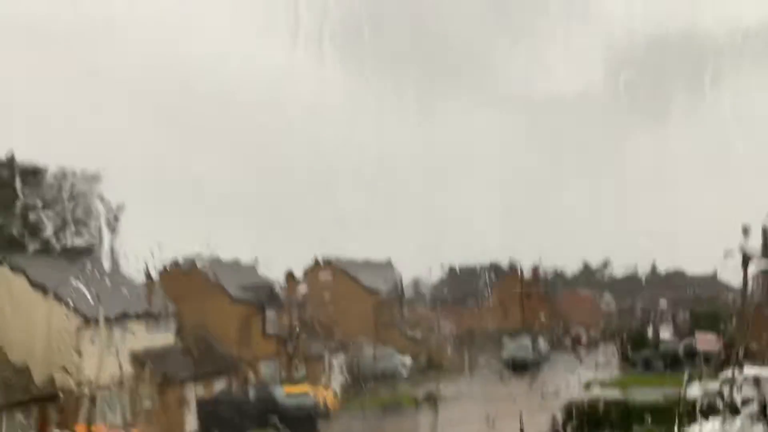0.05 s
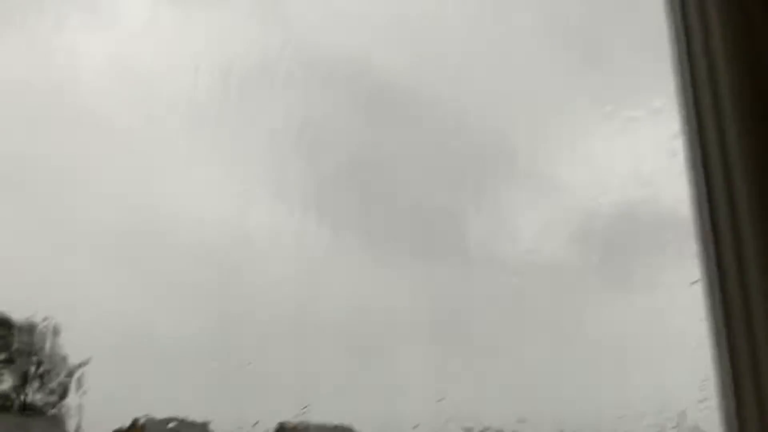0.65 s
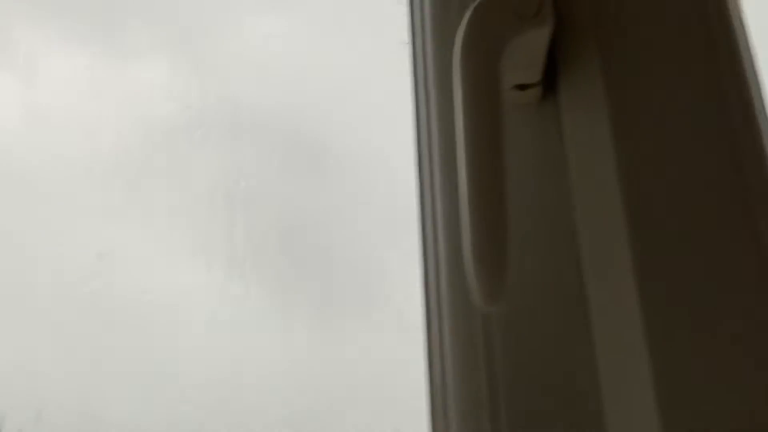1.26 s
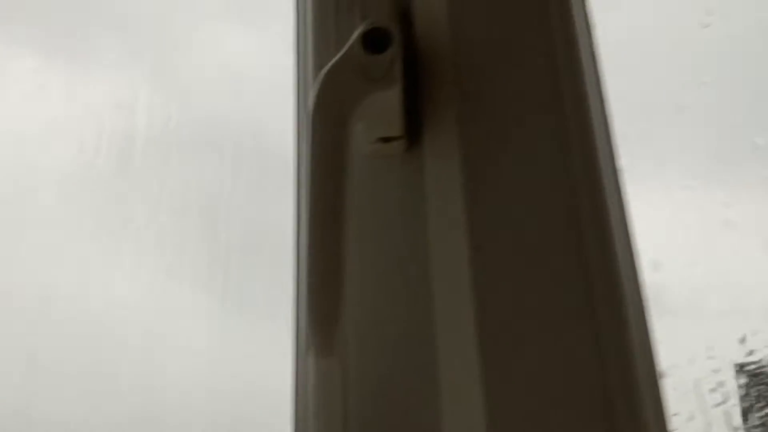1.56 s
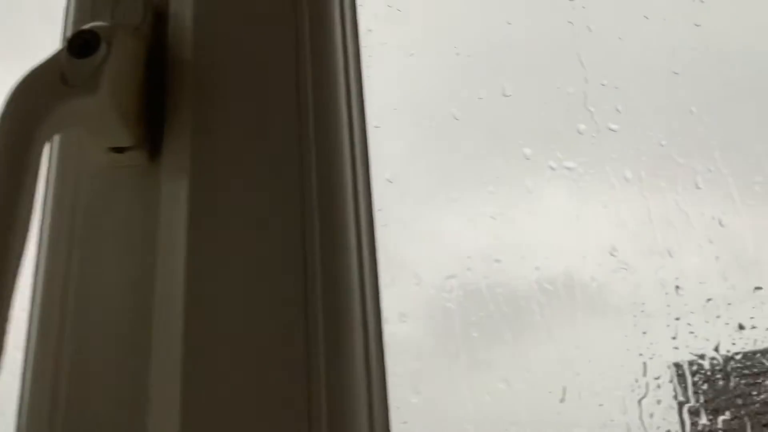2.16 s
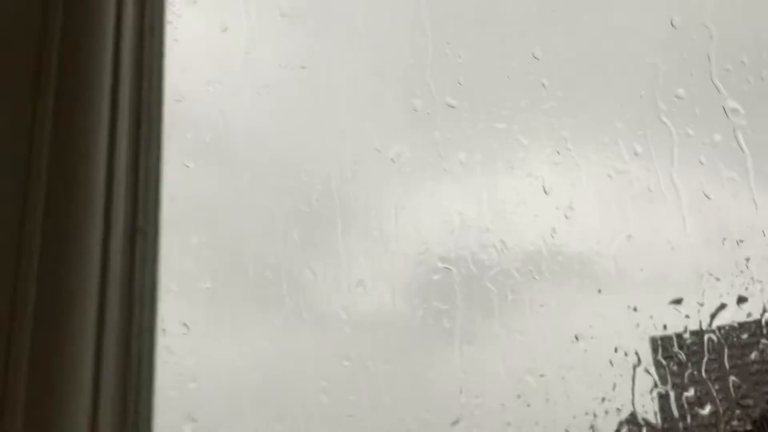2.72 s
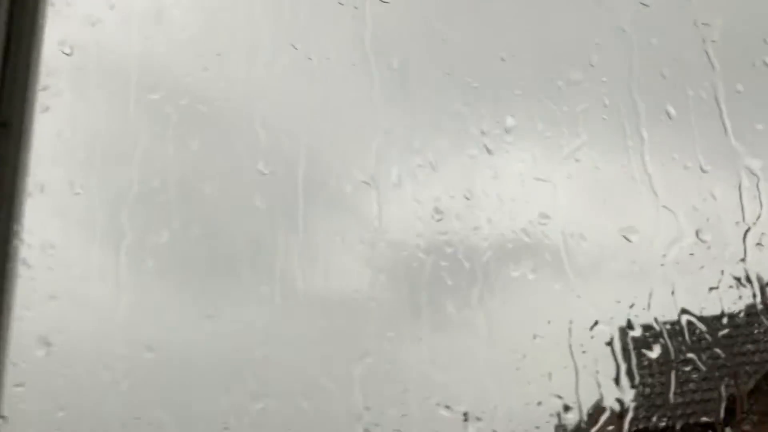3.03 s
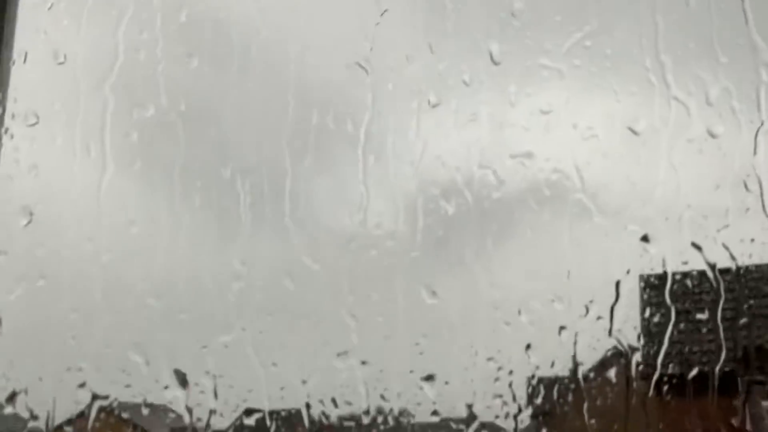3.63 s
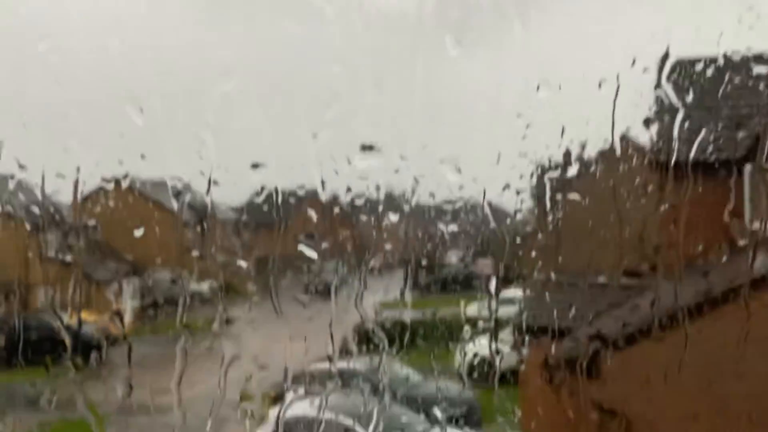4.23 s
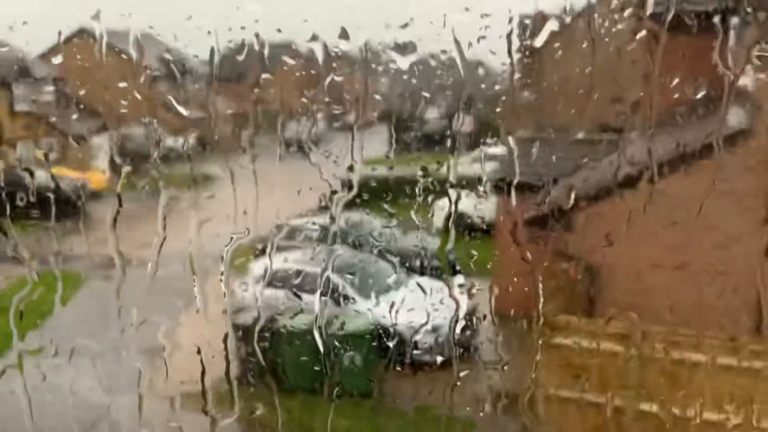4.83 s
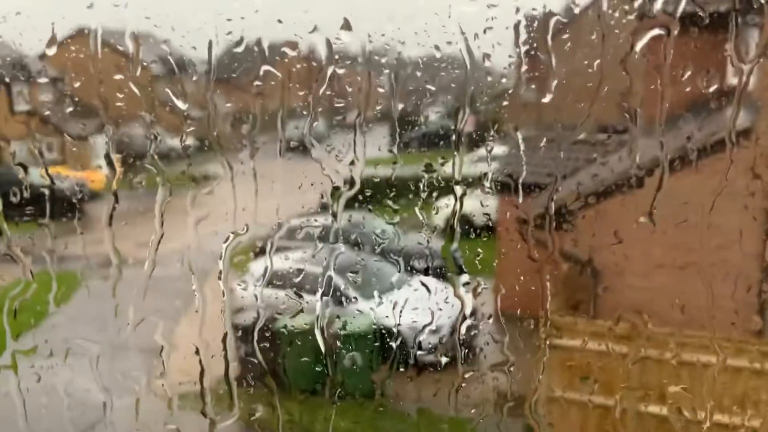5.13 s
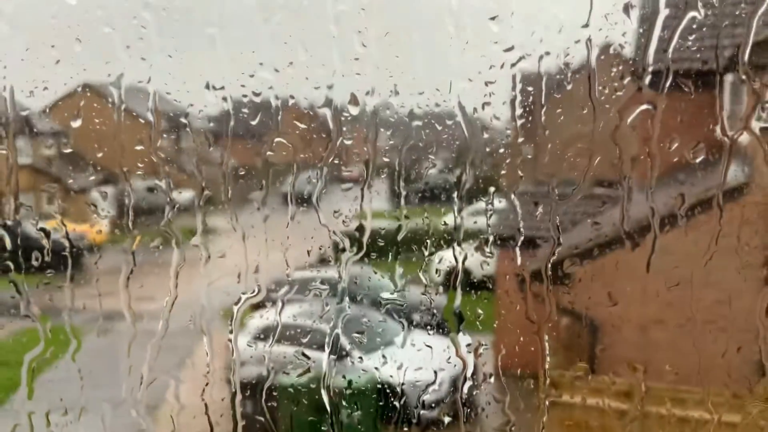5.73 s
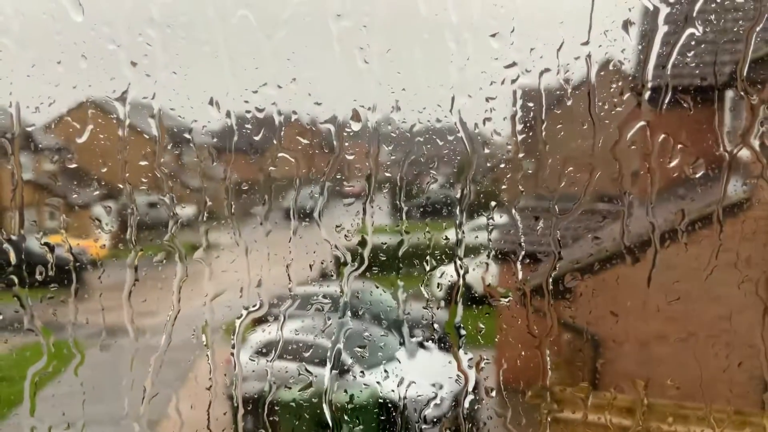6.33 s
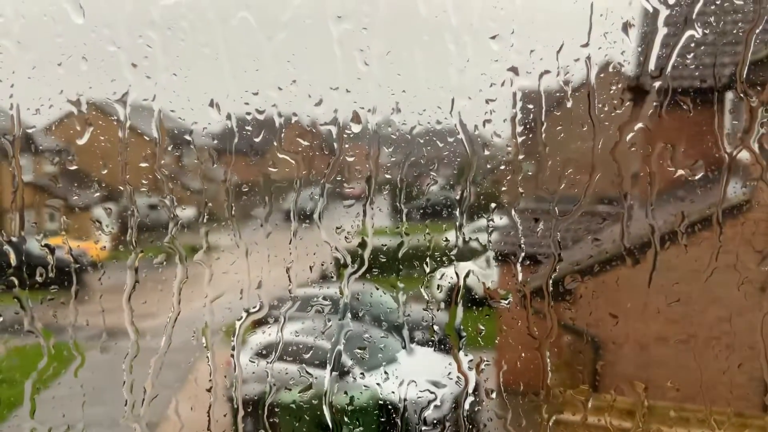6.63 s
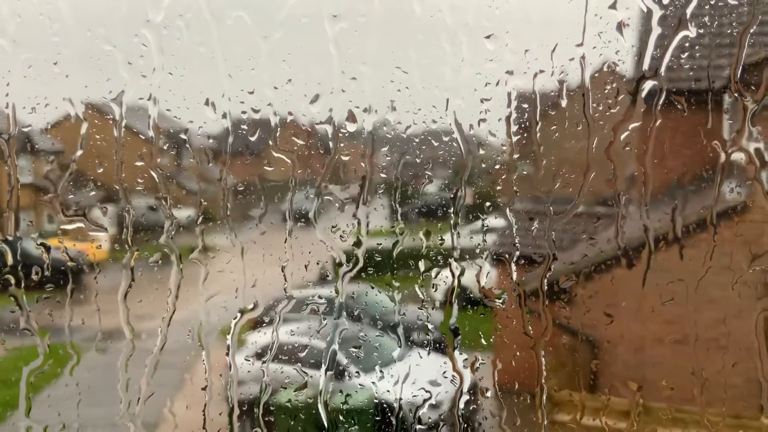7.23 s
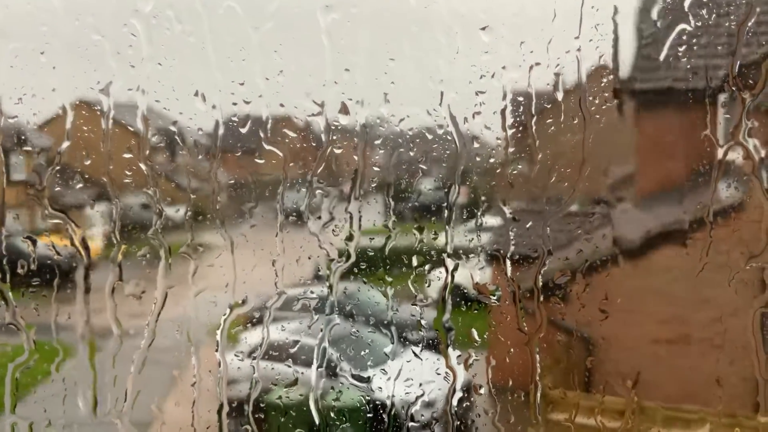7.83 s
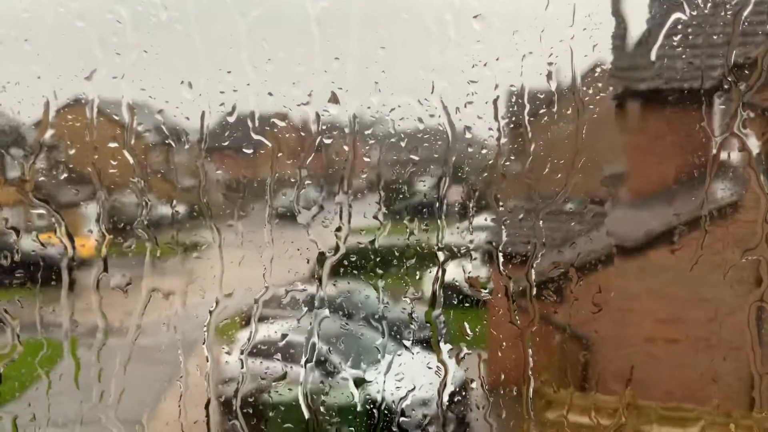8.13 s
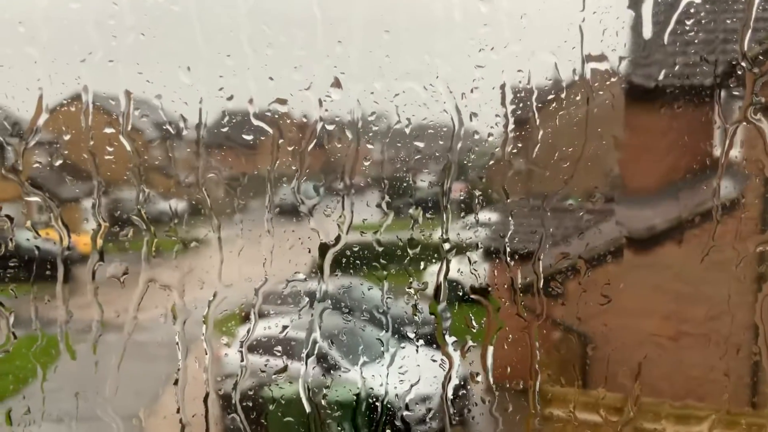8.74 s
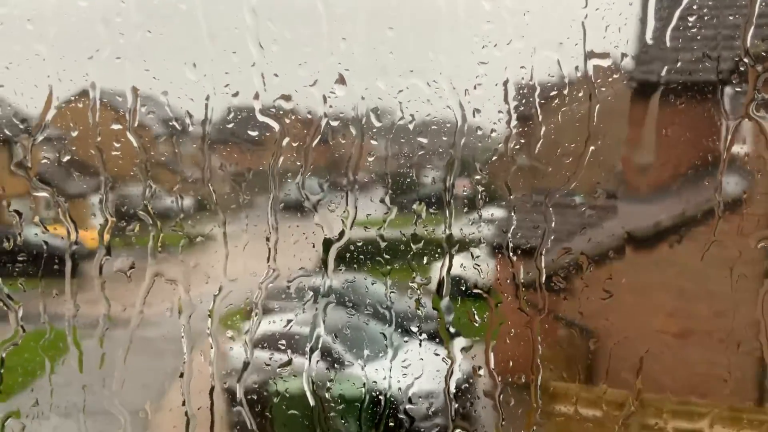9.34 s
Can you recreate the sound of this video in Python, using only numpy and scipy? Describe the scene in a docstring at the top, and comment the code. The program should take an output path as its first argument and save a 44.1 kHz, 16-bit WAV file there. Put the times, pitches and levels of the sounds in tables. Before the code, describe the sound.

Rain taps against window glass from outside while wind rumbles; early on, cloth hisses and fingers rub and bump the microphone.

```python
"""Wind-driven rain on a double-glazed window, heard from the room behind it.
Each drop is an impact that excites the modes of the pane; the patter swells in squalls, over the wash
of rain in the street and a low rumble of wind. A hand-held microphone is swung past the frame: a sleeve
hisses by friction, comb-filtered by its own echoes, and fingers rub and knock on the case, which
carries their vibration to the microphone's two ports."""
import sys
import numpy as np
from scipy import signal
from scipy.fft import rfft, irfft, next_fast_len
from scipy.io import wavfile
from scipy.ndimage import map_coordinates

SR = 44100
rng = np.random.default_rng(int(sys.argv[2]) if len(sys.argv) > 2 else 0)


def log_audio(samples):
    """Write samples as a 16-bit WAV file to the path given in sys.argv[1]."""
    # one column per channel
    frames = np.atleast_2d(samples).T
    # limit to full scale, then quantise
    limited = np.clip(frames, -1, 1)
    pcm = np.round(limited * 32767).astype(np.int16)
    wavfile.write(sys.argv[1], SR, pcm)


N = 413216
TIME = np.arange(N) / SR
FFT_SIZE = next_fast_len(N + SR // 2, real=True)
BIN_HZ = np.maximum(np.arange(FFT_SIZE // 2 + 1) * SR / FFT_SIZE, 1)
BODY_FOLLOWS = 0.58   # dB of change in the rain's dull body per dB of drive

# How hard the rain drives at the pane. Each row: time in seconds, drive in dB.
RAIN_COURSE = [(0, -65), (1.25, -64.5), (1.48, -72.5), (1.75, -60), (2.8, -61.5), (3.0, -64.5), (3.5, -62),
               (3.63, -69.5), (3.8, -62), (4.95, -60.5), (5.5, -69), (7.3, -72.5), (7.8, -74.5),
               (9.37, -73)]
# Squalls throw extra water at the glass. Each row: time of the peak in seconds, added drive in dB.
SQUALL_PEAKS = [(.3, 2), (.66, 4.5), (6.08, 4), (6.31, 9), (6.7, 2.5), (7.12, 4), (7.51, 9.5), (8.06, 3.5),
                (8.48, 4.5), (9.32, 6.5)]
# Spectrum of the rain. Each row: frequency in Hz, gain in dB.
RAIN_SPECTRUM = [(280, 0), (520, 1.5), (690, -2), (790, 0), (900, -1), (1100, 0), (1330, -5), (1600, -4),
                 (2150, -9.5), (2400, -17.5), (2680, -21), (3100, -19), (4400, -23.5), (6200, -27),
                 (7300, -33.5), (9300, -34.5), (15000, -56.5)]
# Modes of the pane. Each row: frequency in Hz, relative level in dB, time to fall 60 dB in seconds.
PANE_MODES = [(770, 5, 0.036), (1586, 6, 0.036), (1790, 1.5, 0.059), (2072, 2, 0.045), (3445, -10, 0.07),
              (4030, -10.5, .06), (4850, -11, 0.044), (6340, -10, 0.053), (8300, -23, 0.05)]
# Sharp impacts: two bright clicks of the sleeve's cloth, then heavy drops on the pane. Each row: start
# in seconds, tap peak in dB, tap pitch in Hz, bright peak in dB, ping pitch in Hz, decay time in ms.
SHARP_IMPACTS = [(4.507, -58, 1600, -41, 7000, 3), (4.556, -60, 1600, -45, 6500, 3),
                 (5.0509, -40.5, 1500, -46, 3680, 5), (5.07, -55, 1600, -46, 6940, 2.8),
                 (5.281, -60, 1610, -49, 5030, 5.4), (5.3445, -53, 1600, -59, 3850, 5),
                 (5.3646, -53, 1600, -53, 6400, 3.7), (6.234, -51, 2100, -62, 4850, 6),
                 (6.628, -49, 1590, -65, 5050, 7.7), (7.0135, -53, 1440, -58, 4400, 4),
                 (7.487, -52, 1600, -57, 5900, 10), (7.5844, -54, 1630, -61, 3600, 6.7),
                 (8.043, -51, 1750, -67, 5250, 5), (8.167, -50, 1400, -56, 3120, 5.5),
                 (8.212, -52, 2170, -59, 3900, 5), (8.435, -58, 2200, -67, 4450, 7),
                 (8.623, -58, 1600, -61, 3050, 6), (8.7155, -47, 1650, -59.5, 4520, 11),
                 (8.6475, -51, 800, -61, 4950, 5), (8.886, -51.5, 1600, -55, 4800, 10),
                 (9.0516, -48, 1500, -51.5, 4600, 4.5), (9.208, -50, 1600, -53.5, 4440, 5),
                 (9.318, -50, 1370, -54, 5200, 7), (9.326, -47.5, 1360, -56, 6360, 9.8)]
# Drips on the sill. Each row: start in seconds, peak in dB, resonance in Hz.
SILL_DRIPS = [(3.8601, -40.5, 1100), (5.298, -44, 870), (8.4674, -51, 830), (8.624, -53, 865)]
# Strokes of the sleeve. Each row: time of the peak in seconds, relative level in dB, rise in seconds,
# fall in seconds, gain of the low band in dB, gain of the topmost sheen in dB.
SLEEVE_STROKES = [(.6, -66, 0.29, 0.21, -7, -20), (1.05, -60.5, 0.16, 0.31, -22, 1.5),
                  (1.76, -58, 0.31, 0.25, -4, 2.5), (2.52, -70.5, 0.28, 0.062, 4, -17),
                  (2.73, -59, 0.2, 0.043, -19, -2), (2.95, -65.5, 0.2, 0.054, 3, 3),
                  (3.17, -55.5, 0.092, 0.06, -7, -1), (3.36, -67.5, 0.084, 0.19, 3, -10),
                  (4.23, -72, 0.057, 0.046, -6, 8.5), (4.51, -62, 0.073, 0.09, 1, 9.5),
                  (4.64, -64.5, 0.058, 0.048, 3, 14), (4.78, -67, 0.1, 0.14, 3, -12)]
# Spectrum of sliding cloth. Each row: frequency in Hz, gain in dB.
SLEEVE_SPECTRUM = [(2500, -28), (3600, -10), (4400, 1), (6000, 0.5), (8500, 2), (12000, -4), (15500, -10)]
# The sleeve's echo as it swings past the glass. Each row: time in seconds, delay in ms, strength 0-1.
GLASS_ECHO = [(.55, .42, .1), (.85, .47, .25), (1.1, .53, .55), (1.4, .608, .62), (1.6, .652, .72),
              (1.87, .688, .6), (2.15, .67, .3), (2.45, .587, .5), (2.68, .505, .72), (2.9, .4, .55),
              (3.1, .305, .5), (3.25, .27, .52), (3.6, .265, .2)]
# Gliding bands in the sleeve's hiss. Each row: start in seconds, length in seconds, level in dB,
# first pitch in Hz, last pitch in Hz.
HISS_GLIDES = [(1.5, .48, -67, 5550, 5050), (2.5, .31, -66, 4550, 5450), (3.06, .16, -66, 4450, 4950),
               (4.45, .26, -61, 4950, 4100), (4.45, .26, -61.5, 6600, 5450),
               (4.57, .12, -65.5, 12350, 12000), (4.6, .1, -64, 13700, 13350),
               (4.59, .1, -66, 15150, 14750)]
# Knocks on the case. Each row: start in seconds, relative level in dB, rise in ms, length in ms,
# dispersion in cycles per cube root of a second.
CASE_KNOCKS = [(0.923, -42, 0.24, 10, 18), (1.046, -41, 2.3, 16, 20.5), (2.198, -41, 0.1, 13, 24),
               (2.262, -13, 19, 40.5, 16), (2.724, -21, 6.7, 12.5, 17), (2.808, -23.5, 5.9, 30, 18.7),
               (3.05, -35, 0.3, 1.5, 18), (3.073, -12, 0.53, 30.5, 18.4), (3.158, -34.5, .3, 3.1, 18.4),
               (3.22, -38, 0.14, 22, 19.6), (3.2705, -32, 0.082, 13, 20), (3.459, -14, 5.7, 7.3, 20.2),
               (3.487, -29, 3.2, 8.3, 18), (3.618, -31, 1.7, 20, 20), (3.8602, -24, 0.52, 0.93, 23)]
# Fingers rubbing the case. Each row: start in seconds, length in seconds, relative level in dB,
# top of the rumble in Hz, scuff relative to the rumble in dB.
FINGER_RUBS = [(.0, 0.045, -38, 128, -10), (0.487, 0.12, -44.5, 160, -11), (1.03, 0.052, -46.5, 200, -19),
               (2.268, 0.058, -37.5, 130, -16), (2.314, 0.13, -47.5, 103, -12),
               (2.447, 0.13, -34, 150, -36), (2.561, 0.1, -42.5, 110, -8), (2.636, 0.056, -34, 85, -14.5),
               (2.672, 0.097, -33, 192, -14), (2.751, 0.073, -37, 220, -10), (2.848, 0.16, -39.5, 195, -22),
               (2.99, 0.068, -46, 120, -23), (3.048, 0.03, -28, 199, -14.5), (3.098, 0.064, -32, 140, -18),
               (3.154, .045, -34, 200, -13), (3.204, 0.039, -36, 215, -15), (3.235, 0.05, -42, 220, -11),
               (3.313, 0.082, -41, 100, -8), (3.364, 0.17, -36.5, 211, -12), (3.478, 0.16, -41, 191, -6.5),
               (3.622, 0.15, -45, 190, -20)]
# Slow course of the wind. Each row: time in seconds, buffeting level in dB, roar level in dB.
WIND_COURSE = [(0, -45, -50.5), (.4, -51.5, -53.5), (.7, -52.5, -51.5), (1.15, -51, -57), (1.45, -51, -61),
               (1.7, -50, -58.5), (2, -55, -53), (4.05, -59.5, -60.5), (4.75, -58.5, -50), (5.05, -57, -56),
               (6.5, -55.5, -54.5), (7.55, -53.5, -59), (7.8, -58, -61.5), (9.37, -60.5, -57.5)]
# Spectrum of the wind behind the glass. Each row: frequency in Hz, gain in dB.
WIND_SPECTRUM = [(25, -40), (54, -6), (92, -1), (221, -8), (253, -5), (382, -13), (512, -18), (600, -18.5),
                 (780, -72), (1320, -120)]
# Gusts singing faintly round the frame. Each row: time in seconds, level in dB.
GUST_COURSE = [(0, -54), (.7, -57), (1.1, -63), (1.5, -70.5), (1.9, -62), (2.35, -57), (2.8, -66),
               (3.8, -65.5), (9.37, -109)]
# Spectrum of the gusts. Each row: frequency in Hz, gain in dB.
GUST_SPECTRUM = [(300, -10), (600, -9.5), (850, -9), (1150, 1), (1400, -5), (1900, -14), (3000, -45)]
# The sound fields of room, sleeve and gusts at the two ports. Each row: frequency in Hz,
# level of left over right in dB, coherence 0-1, phase lead of the left in radians.
ROOM_FIELD = [(100, .4, .99, -.15), (280, -.6, .92, -.1), (470, 1.2, .68, .3), (750, 8.5, .14, -1),
              (1050, 5, .22, -2), (1600, 4, .6, 0), (2100, 2.5, .2, -.7), (2400, 2, .45, -3),
              (2850, 2, .75, 2.8), (3500, 1.3, .74, 1.2), (4200, .7, .77, .2), (5000, 1, .7, .2),
              (6000, -3, .7, .3), (7300, -1, .65, 1), (8000, 0, .985, 0)]
SLEEVE_FIELD = [(3500, 1, .5, 3), (4400, 1, .45, 1), (5000, 2, .3, -1), (5800, -4, .5, 2.5),
                (6600, -2, .5, 2.5), (7300, 0, .6, 2), (8050, 0, .975, 0)]
GUST_FIELD = [(300, 5, .7, -.2), (650, 5, 0.79, -.2), (1000, 4, 0.8, 0.33), (1500, 11, 0.5, .2)]


def rain(wash_db=-7.5, patter_db=-4.5, spray_wash_db=-7.0, spray_patter_db=-4, split_hz=2400):
    """Superposition: street drops merge into a wash under the patter; harder rain is brighter."""
    spray_db = rain_drive()
    body_db = -55.5 + BODY_FOLLOWS * (spray_db + 61)
    wash = at_ports(coloured(through_pane(rng.standard_normal((2, N))), RAIN_SPECTRUM), ROOM_FIELD)
    drops = at_ports(coloured(through_pane(patter()), RAIN_SPECTRUM), ROOM_FIELD)
    body_hz, spray_hz = (600, 2200), (2500, 4200)
    body = from_db(wash_db) * unit(wash, body_hz) + from_db(patter_db) * unit(drops, body_hz)
    spray = from_db(spray_wash_db) * unit(wash, spray_hz)
    spray += from_db(spray_patter_db) * unit(drops, spray_hz)
    body = butter(body, split_hz, "low", order=7)
    spray = butter(spray, split_hz, "high", order=7)
    return from_db(body_db) * body + from_db(spray_db) * spray


def rain_drive(rise_s=0.093, fall_s=0.13):
    """Amplitude envelope of the rain in dB: a slow course plus a Gaussian swell for each squall."""
    drive_db, = in_time(RAIN_COURSE)
    for peak_s, db in SQUALL_PEAKS:
        drive_db += db * np.exp(-from_peak(peak_s, rise_s, fall_s) ** 2)
    return drive_db


def patter(per_s=380, size_db=7.0, flurry_db=1.66, spots=8):
    """Shot noise: small drops of random size land in flurries on several spots of the pane."""
    clicks = impulses(per_s * from_db(flurry_db * drift(6)), size_db, size_cap=2.8)
    spot = rng.integers(0, spots, N)
    return unit(sum(signal.oaconvolve([clicks * (spot == k)], splat(), axes=1) for k in range(spots)))


def splat(tick_t60=0.016, ring_t60=0.28, ring_db=-5, room_t60=0.36, room_db=-15, uneven_db=4.5):
    """Impulse response of one spot: a tick, a short ring and the room's tail, randomly coloured."""
    t = TIME[:SR // 4]
    envelope = decay(t, tick_t60) + decay(t, ring_t60, ring_db) + decay(t, room_t60, room_db)
    burst = envelope * rng.standard_normal((2, len(t)))
    edges_hz = np.geomspace(200, 16000, 9)
    gains = from_db(uneven_db * rng.standard_normal(8))
    sound = sum(g * butter(burst, band, "band") for g, band in zip(gains, zip(edges_hz, edges_hz[1:])))
    return sound / np.sqrt(np.sum(sound ** 2))


def through_pane(x, ring_db=-6, width_hz=120):
    """Resonant transmission: the glass passes sound best at its own modes."""
    return x + from_db(ring_db) * sum(resonate(x, hz, hz / width_hz) for hz, _, _ in PANE_MODES)


def taps(per_s=55, size_db=3.0, level_db=-70, low_hz=550, high_hz=2100, ring_cycles=18, spots=14):
    """Damped vibration: middling drops tap each spot at its own pitch, the higher dying sooner."""
    clicks = impulses(per_s, size_db, size_cap=2)
    spot, t = rng.integers(0, spots, N), TIME[:SR // 20]
    sound = 0
    for k, hz in enumerate(np.geomspace(low_hz, high_hz, spots)):
        burst = rng.standard_normal((2, len(t))) * decay(t, ring_cycles / hz)
        tap = butter(burst, (hz / 1.15, hz * 1.15), "band")
        sound += signal.oaconvolve([clicks * (spot == k)], tap / tap.std() / np.sqrt(hz), axes=1)
    drive_db = rain_drive()
    gain = from_db(level_db + BODY_FOLLOWS * (drive_db - drive_db.mean()))
    return gain * unit(at_ports(sound, ROOM_FIELD))


def ticks(per_s=70, size_db=2.5, level_db=-75.0, follows=0.66, ring_db=4, spots=6):
    """Modal excitation: drops click on the nearest glass, each spot ringing its own mix of modes."""
    clicks = impulses(per_s, size_db, size_cap=2.5)
    spot, t = rng.integers(0, spots, N), TIME[:SR // 16]
    crack = decay(t, t60=0.02) * rng.standard_normal((spots, 2, len(t)))
    crack = butter(butter(crack, 1500, "high"), 5400, "low", order=6)
    ring = sum(rng.standard_normal((spots, 2, 1)) * mode for mode in pane_modes(t))
    responses = crack / crack.std() + from_db(ring_db) * ring / ring.std()
    sound = sum(signal.oaconvolve([clicks * (spot == k)], responses[k], axes=1) for k in range(spots))
    drive_db = rain_drive()
    gain = from_db(level_db + follows * (drive_db - drive_db.min()))
    return gain * unit(at_ports(sound, ROOM_FIELD))


def pane_modes(t):
    """Free vibration: each normal mode of the pane is a damped sinusoid."""
    return [decay(t, t60, db) * np.sin(2 * np.pi * hz * t) for hz, db, t60 in PANE_MODES]


def sharp_impacts(ring_db=-9, ping_db=4, band_ratio=1.4, tap_stretch=1.2):
    """Impact excitation: a heavy drop or a click of cloth gives a ringing tap and a bright ping."""
    out, t = np.zeros((2, N)), TIME[:SR // 10]
    for start_s, tap_db, tap_hz, bright_db, ping_hz, decay_ms in SHARP_IMPACTS:
        burst = rng.standard_normal((2, len(t)))
        fade = np.exp(-1000 * t / decay_ms)
        ring = sum(rng.choice([-1, 1], (2, 1)) * mode for mode in pane_modes(t))
        tap = resonate(burst * fade ** (1 / tap_stretch), tap_hz, quality=7)
        tap = butter(tap, 2 * tap_hz, "low", order=3)
        blow = tap / tap.std() + from_db(ring_db) * ring / ring.std()
        click = butter(burst * fade, (ping_hz / band_ratio, ping_hz * band_ratio), "band", order=3)
        ping = resonate(click, ping_hz, quality=11)
        bright = click / click.std() + from_db(ping_db) * ping / ping.std()
        add(out, start_s, with_peak(blow, tap_db) + with_peak(bright, bright_db))
    return at_ports(out, ROOM_FIELD)


def drips(quality=3.5, top_hz=2200):
    """Heavily damped resonance: a drip lands on the sill with a dull, faintly pitched tap."""
    out = np.zeros((2, N))
    for start_s, db, hz in SILL_DRIPS:
        blow = splat(tick_t60=.03, ring_t60=.1, ring_db=-9, uneven_db=1)
        tap = butter(resonate(blow, hz, quality), top_hz, "low", order=3)
        add(out, start_s, with_peak(tap, db))
    return at_ports(out, ROOM_FIELD)


def sleeve(level_db=-2, grain_db=0.64, patchy_db=2.5, split_hz=6800, sheen_hz=12000):
    """Friction noise: sliding cloth hisses with each stroke, joined by its echoes and gliding bands."""
    hiss = coloured(rng.standard_normal((2, N)), SLEEVE_SPECTRUM) * from_db(grain_db * drift(76))
    hiss /= np.std(butter(hiss[0], (7500, 15000), "band", order=4))
    low = butter(hiss, split_hz, "low", order=3) * from_db(patchy_db * drift(23))
    high = butter(hiss, split_hz, "high", order=3) * from_db(.5 * patchy_db * drift(21))
    strokes = np.zeros((2, N))
    for peak_s, db, rise_s, fall_s, low_db, sheen_db in SLEEVE_STROKES:
        swell_db = -7 * from_peak(peak_s, rise_s, fall_s) ** 1.3   # a fairly pointed crest
        heard = swell_db > -40
        cloth = from_db(low_db) * low[:, heard] + high[:, heard]
        sheen = from_db(sheen_db) * butter(cloth, sheen_hz, "high", order=3)
        cloth = butter(cloth, sheen_hz, "low", order=3) + sheen
        strokes[:, heard] += from_db(level_db + db + swell_db[heard]) * cloth
    return at_ports(strokes + window_echoes(strokes) + gliding_bands(), SLEEVE_FIELD)


def window_echoes(pair, flutter_db=1.3, jitter_ms=.009, frame_gain=0.19, frame_path_ratio=2.35):
    """Interference: moving echoes off glass and frame sweep a comb when added to the direct sound."""
    lag_ms, strength = in_time(GLASS_ECHO)
    echoes = np.zeros((2, N))
    for path_ratio, gain in ((1, -strength), (frame_path_ratio, frame_gain)):
        delay_s = path_ratio * (lag_ms + jitter_ms * drift(14)) / 1000
        delayed = np.array([map_coordinates(side, [(TIME - delay_s) * SR], order=3) for side in pair])
        echoes += gain * from_db(flutter_db * drift(18)) * delayed
    return echoes


def gliding_bands(width_hz=210, taper=0.55):
    """Narrow-band noise: bands of hiss glide in pitch as the sleeve swishes past the glass."""
    out = np.zeros((2, N))
    for start_s, length_s, db, from_hz, to_hz in HISS_GLIDES:
        n = int(length_s * SR)
        phase = 2 * np.pi * np.cumsum(np.linspace(from_hz, to_hz, n)) / SR
        in_phase, quadrature = butter(rng.standard_normal((2, 2, SR))[..., :n], width_hz, "low")
        band = in_phase * np.cos(phase) + quadrature * np.sin(phase)
        add(out, start_s, from_db(db) * signal.windows.tukey(n, taper) * band / band.std())
    return out


def knocks(snap_ms=0.61, hollow_hz=900, hollow_db=2):
    """Dispersion: bending waves carry highs ahead of lows, a falling chirp that rings the hollow case."""
    out, t = np.zeros(N), TIME[:SR // 8]
    ms = 1000 * t
    contact = 1 + np.exp(-ms / snap_ms)   # the first touch is the hardest
    for start_s, db, rise_ms, length_ms, dispersion in CASE_KNOCKS:
        chirp = np.sin(2 * np.pi * dispersion * np.cbrt(t) + np.pi * 4 / 3)
        swell = (1 - np.exp(-(ms / rise_ms) ** 2)) * np.exp(-(ms / length_ms) ** 3)
        add(out, start_s, from_db(db) * contact * swell * chirp)
    return out + from_db(hollow_db) * resonate(out, hollow_hz, quality=3)


def rubs(level_db=1.0, taper=0.53, low_hz=50, scuff_hz=1200):
    """Sliding friction: skin drags over the case in short, dull strokes with a faint scuff on top."""
    out = np.zeros(N)
    friction = butter(rng.standard_normal(N), low_hz, "high")
    for start_s, length_s, db, top_hz, scuff_db in FINGER_RUBS:
        start = round(start_s * SR)
        slips = friction[start:start + int(length_s * SR)]
        rumble = unit(butter(slips, top_hz, "low", order=3))
        scuff = from_db(scuff_db) * unit(butter(slips, scuff_hz, "low"))
        swell = signal.windows.tukey(len(slips), taper)
        add(out, start_s, from_db(db + level_db) * swell * (rumble + scuff))
    return out


def judder(start_s=2.484, gap_s=.0152, peak_db=-25.5, hz=110, slip_s=0.0062, slips=5):
    """Slow stick-slip: a dragging finger catches and lets go, each slip a dull bump."""
    out, t = np.zeros(N), TIME[:SR // 20]
    bump = np.sin(2 * np.pi * hz * t) * t / slip_s * np.exp(-(t / slip_s) ** 2)
    for k in range(slips):
        add(out, start_s + k * gap_s, with_peak(bump, peak_db + rng.normal()))
    return out


def squeak(start_s=2.2605, rise_s=0.0023, length_s=0.013, level_db=-30.5, hz=486):
    """Fast stick-slip: a fingertip oscillates for a few cycles as it shifts its grip."""
    out, t = np.zeros(N), TIME[:SR // 20]
    swell = (1 - np.exp(-t / rise_s)) * np.exp(-(t / length_s) ** 2)
    add(out, start_s, from_db(level_db) * swell * np.sin(2 * np.pi * hz * t))
    return out


def through_case(x, near_top_hz=3500, far_low_hz=35, far_top_hz=600):
    """Structure-borne sound: the left port is by the hand; only the lower range reaches the right."""
    far = butter(butter(x, far_low_hz, "high", order=1), far_top_hz, "low")
    return np.array([butter(x, near_top_hz, "low"), far])


def wind(split_hz=145, buffet_db=1.73):
    """Transmission loss: glass passes the low buffeting, but little of the rush round the frame."""
    deep_db, roar_db = in_time(WIND_COURSE)
    rush_db, = in_time(GUST_COURSE)
    air = coloured(rng.standard_normal((2, N)), WIND_SPECTRUM)
    deep = butter(air, split_hz, "low", order=5)
    roar = butter(air, split_hz, "high", order=5)
    rumble = deep / deep.std() * from_db(deep_db) + roar / roar.std() * from_db(roar_db)
    rush = coloured(rng.standard_normal((2, N)), GUST_SPECTRUM)
    rush = rush / rush.std() * from_db(rush_db)
    return at_ports(rumble * from_db(buffet_db * drift(20)), ROOM_FIELD) + at_ports(rush, GUST_FIELD)


def at_ports(pair, field):
    """Partial coherence: two unrelated signals mix into the left and right of one sound field."""
    hz, tilt_db, coherence, lead = np.transpose(field)
    alike = np.interp(np.log(BIN_HZ), np.log(hz), coherence * np.exp(-1j * lead))
    right_gain = from_db(-np.interp(np.log(BIN_HZ), np.log(hz), tilt_db))
    left, other = rfft(pair, FFT_SIZE)
    right = right_gain * (alike * left + np.sqrt(1 - abs(alike) ** 2) * other)
    centre_gain = np.sqrt(1 + right_gain ** 2 + 2 * right_gain * alike.real) / 2
    return irfft(np.array([left, right]) / centre_gain, FFT_SIZE)[:, :N]


def impulses(per_s, size_db, size_cap):
    """Poisson process: impulses of random level, at most size_cap times size_db above unity."""
    landed = rng.random(N) < per_s / SR
    return landed * from_db(size_db * np.minimum(rng.exponential(1, N), size_cap))


def drift(rate_hz, step=40):
    """Random modulation: low-passed noise with a standard deviation of 1."""
    pole = np.exp(-2 * np.pi * rate_hz * step / SR)
    noise = rng.standard_normal(N // step + 2002)
    slow = signal.lfilter([1], [1, -2 * pole, pole * pole], noise)[2000:]   # once the filter has settled
    return np.interp(np.arange(N) / step, np.arange(len(slow)), slow / slow.std())


def coloured(x, spectrum):
    """Spectral shaping by a gain curve that falls away past its ends."""
    hz, db = np.transpose(spectrum)
    gain = from_db(np.interp(np.log(BIN_HZ), np.log(hz), db))
    skirts = (1 + (.7 * hz[0] / BIN_HZ) ** 8) * (1 + (BIN_HZ / hz[-1] / 1.3) ** 8)
    return irfft(rfft(x, FFT_SIZE) * gain / np.sqrt(skirts), FFT_SIZE)[..., :N]


def resonate(x, hz, quality):
    """Second-order resonance with a gain of 1 at its top."""
    return signal.lfilter(*signal.iirpeak(hz, quality, fs=SR), x + 1e-18)


def butter(x, hz, kind, order=2):
    """Causal, maximally flat filter."""
    return signal.sosfilt(signal.butter(order, hz, kind, fs=SR, output="sos"), x + 1e-18)


def decay(t, t60, db=0):
    """Exponential decay from db, falling 60 dB in t60 seconds."""
    return from_db(db - 60 * t / t60)


def from_peak(peak_s, rise_s, fall_s):
    """Distance from a peak, in rise times before it and fall times after it."""
    return np.maximum((peak_s - TIME) / rise_s, (TIME - peak_s) / fall_s)


def in_time(rows):
    """Linear interpolation of each column of a curve at every sample."""
    times, *columns = np.transpose(rows)
    return [np.interp(TIME, times, column) for column in columns]


def unit(x, band=None):
    """Normalisation: the channels' mean gets an rms of 1, within a band if one is given."""
    mono = np.atleast_2d(x).mean(axis=0)
    return x / np.std(mono if band is None else butter(mono, band, "band", order=4))


def with_peak(x, db):
    """Normalisation to a peak level in dB."""
    return from_db(db) * x / abs(x).max()


def from_db(db):
    """Decibels to amplitude ratio."""
    return 10 ** (np.asarray(db) / 20)


def add(track, start_s, sound):
    """Superpose a sound on a track from start_s on."""
    start = round(start_s * SR)
    track[..., start:start + sound.shape[-1]] += sound[..., :N - start]


def scene(hiss_db=-95):
    """Superposition of the weather outside, the handling inside and faint microphone hiss."""
    hiss = from_db(hiss_db) * rng.standard_normal(N)
    airborne = rain() + taps() + ticks() + sharp_impacts() + drips() + wind() + sleeve()
    structure_borne = through_case(rubs() + judder() + knocks() + squeak())
    return airborne + structure_borne + hiss


def record(dry):
    """Band limiting: bass below 22 Hz and treble above 15.7 kHz are cut."""
    low_pass = signal.ellip(12, .1, 70, 15700, fs=SR, output="sos")
    return signal.sosfilt(low_pass, butter(dry, 22, "high"))


dry = scene()
out = record(dry)
log_audio(out)
```